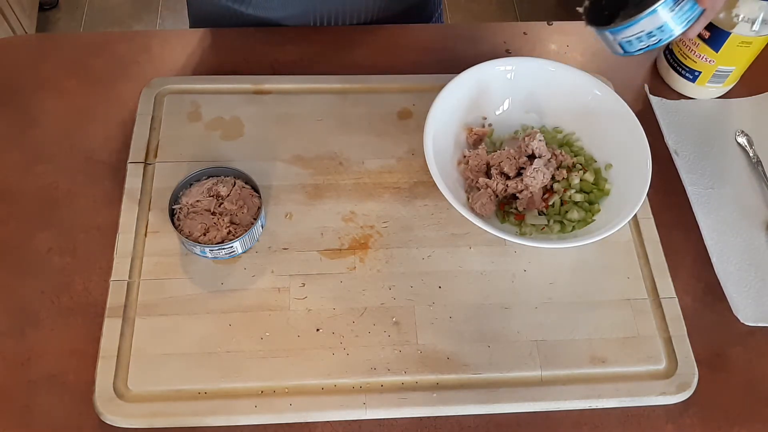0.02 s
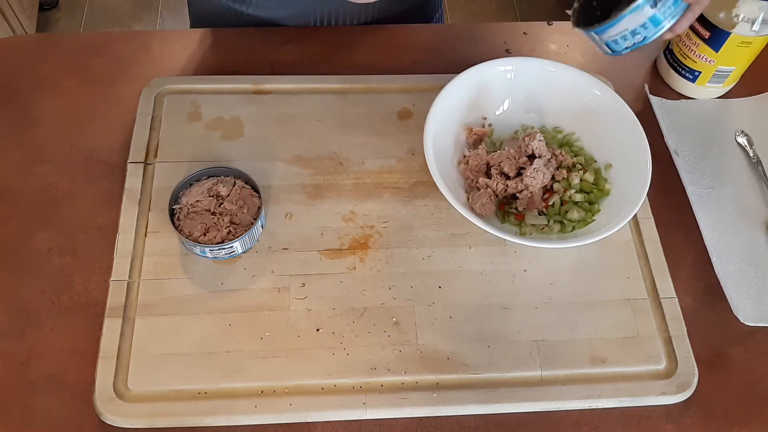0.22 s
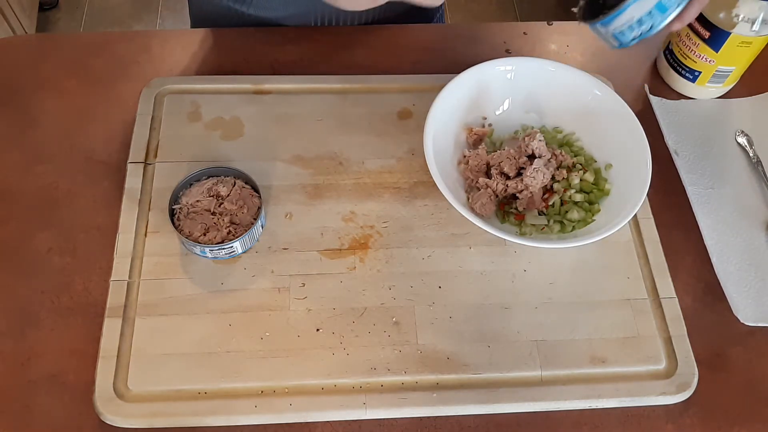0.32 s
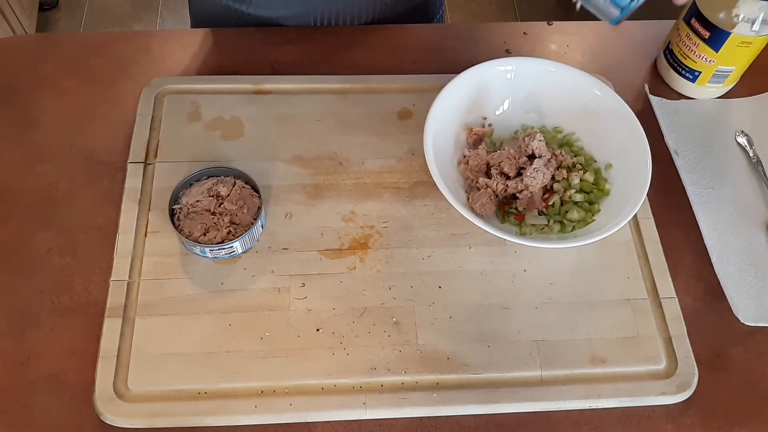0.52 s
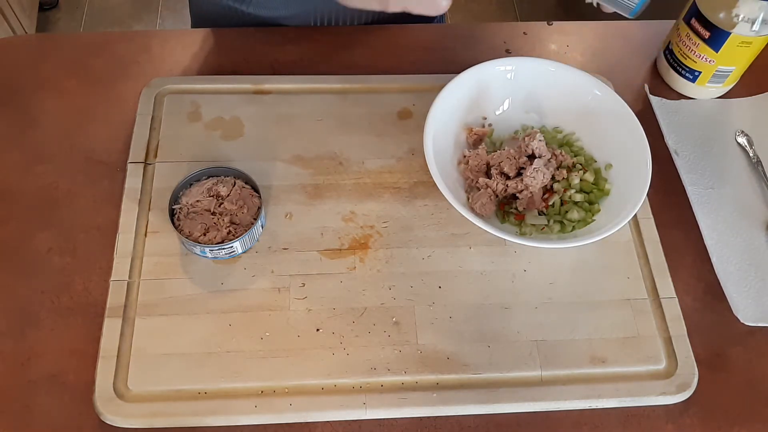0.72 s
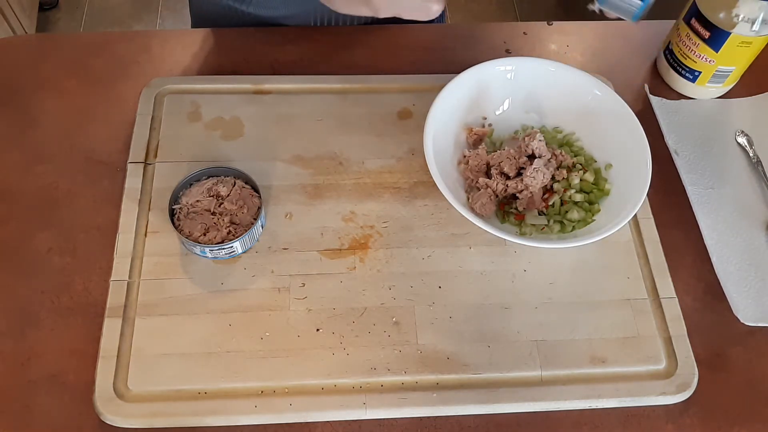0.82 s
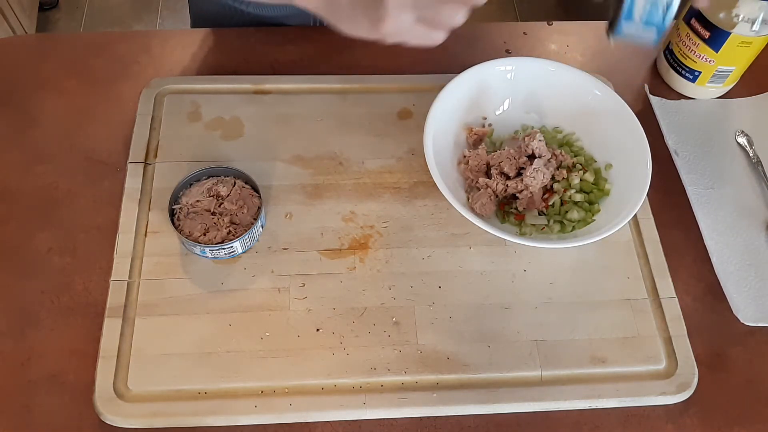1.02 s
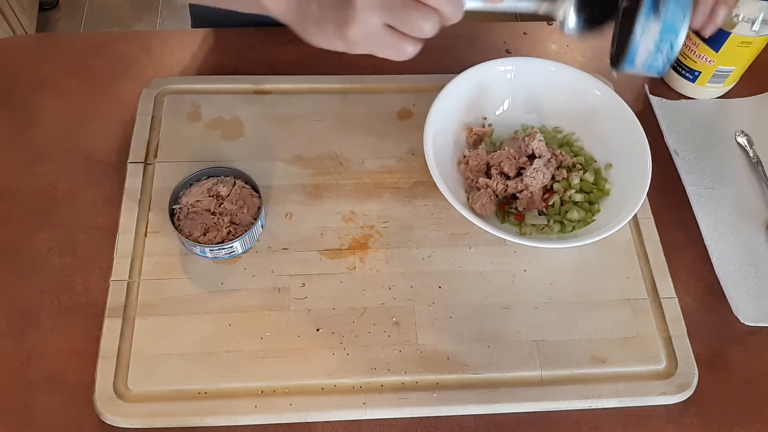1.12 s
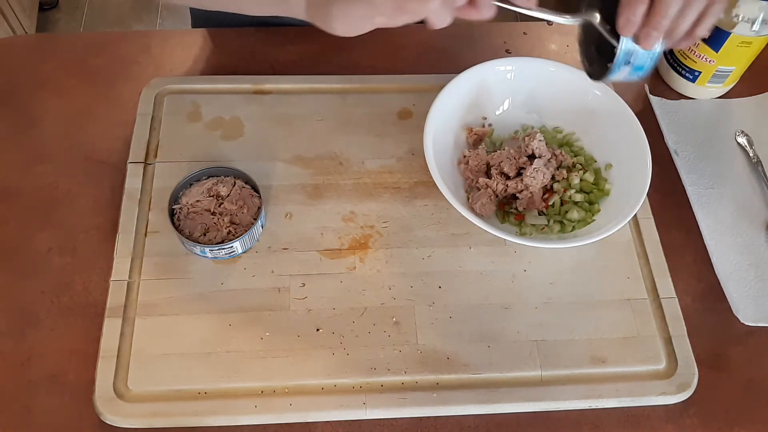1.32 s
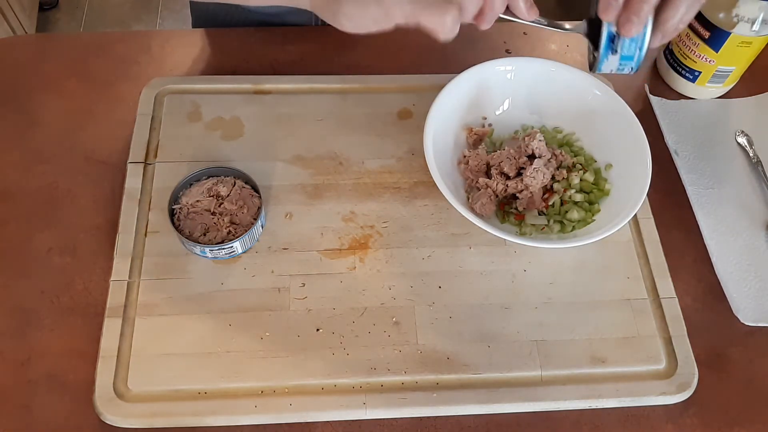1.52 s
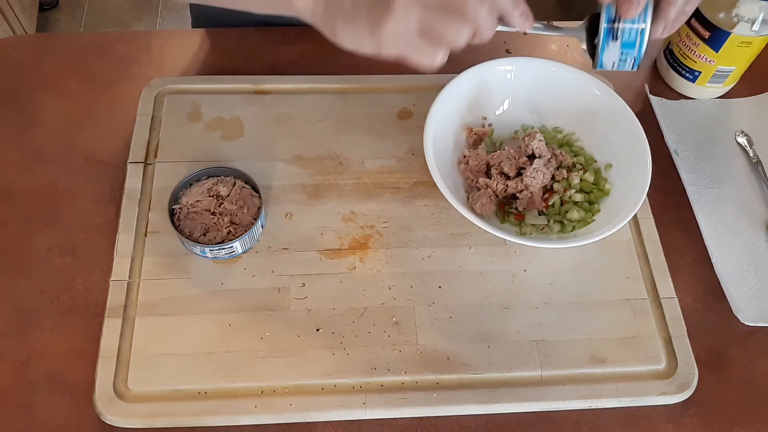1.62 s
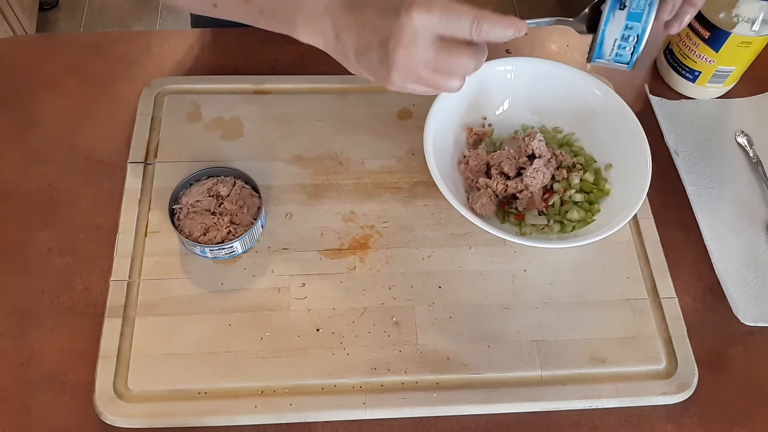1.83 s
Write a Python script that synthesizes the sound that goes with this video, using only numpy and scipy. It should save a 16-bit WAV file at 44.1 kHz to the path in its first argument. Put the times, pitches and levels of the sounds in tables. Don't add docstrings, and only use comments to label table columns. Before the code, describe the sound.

Sharp, short clinks and scrapes of a steel spoon against a hand-held tin can, faint fridge hum

```python
import sys
import numpy as np
from scipy import signal
from scipy.fft import rfft, irfft
from scipy.io import wavfile

SR = 44100
rng = np.random.default_rng(int(sys.argv[2]) if len(sys.argv) > 2 else 0)


def volts(x):
    e = np.asarray(x, float) / 20
    return 10 ** e


def master_out(mix):
    frames = np.transpose(np.atleast_2d(mix))
    ceiling = np.clip(frames, -1, 1)
    pcm = np.round(ceiling * 32767).astype(np.int16)
    wavfile.write(sys.argv[1], SR, pcm)


N = 83790
SECONDS = np.arange(N) / SR
TIP_FROM_S, LIP_FROM_S = 1.2, 1.6
RINGING_LOW_CUT_HZ, SMALL_LOW_CUT_HZ = 310, 630
THUD_S, THUD_LOW_HZ, THUD_HIGH_HZ = 0.01, 88.5, 450


def at_hz(points, hz):
    points_hz, values = np.transpose(points)
    return np.interp(np.log(np.maximum(hz, 1)), np.log(points_hz), values)


def rms_one(x):
    return x / np.sqrt(np.mean(x ** 2) + 1e-20)


def colour(x, points):
    return irfft(rfft(x) * volts(at_hz(points, np.fft.rfftfreq(N, 1 / SR))), N)


def above(x, hz):
    return signal.sosfilt(signal.butter(4, hz, "high", fs=SR, output="sos"), x)


def ring(clicks, hz, t60):
    radius, angle = volts(-60 / (t60 * SR)), 2 * np.pi * hz / SR
    feedback = [1, -2 * radius * np.cos(angle), radius * radius]
    return signal.lfilter([0, np.sin(angle)], feedback, clicks + 1e-18)


def grit(per_s=5100, spread_db=5.5):
    sizes = volts(spread_db * np.minimum(rng.exponential(1, N), 4)) * rng.choice([-1, 1], N)
    return rms_one(sizes * (rng.random(N) < per_s / SR))


def after_knocks(times, gains, decay_s):
    jumps = np.zeros(N)
    np.add.at(jumps, (times * SR).astype(int), gains)
    envelope = signal.lfilter([1], [1, -np.exp(-1 / (decay_s * SR))], jumps + 1e-18)
    return jumps, envelope


# start in seconds, length in seconds, then spoon, can and hiss levels in dB.
STROKES = [(-.03, 0.07, -45.5, -62, -44), (0.201, 0.029, -42, -54, -39), (0.324, 0.017, -79, -85, -58),
           (0.732, 0.08, -84.5, -88.5, -65.5), (1.02, 0.06, -63, -92.5, -57.5),
           (1.235, 0.019, -57, -67.5, -46.5), (1.258, 0.0129, -36, -61.5, -49),
           (1.27, 0.026, -40.5, -89, -41), (1.287, 0.019, -35, -64, -43), (1.337, 0.024, -42.5, -61, -38),
           (1.623, 0.04, -68.5, -70, -57.5), (1.635, .02, -56, -57.5, -69.5),
           (1.652, 0.021, -69, -61, -56.5), (1.69, 0.13, -78.5, -77, -62),
           (1.754, 0.049, -70.5, -67, -65.5), (1.83, 0.058, -94, -86, -66)]


def pressure(column):
    out = np.zeros(N)
    for row in STROKES:
        start, length = row[:2]
        shape = np.interp((SECONDS - start) / length, [0, 0.52, 1], [0, 1, 0])
        out += volts(row[column]) * np.sin(np.pi / 2 * shape)
    return out


# frequency in Hz, left minus right in dB.
BALANCE = [(60, -1.5), (110, -6.5), (200, 3.5), (380, 5.5), (700, -0.5), (1290, 1), (2380, 4.5), (4400, -6),
           (8120, -4.5), (15000, -15.5)]


def to_ports(x, hz, lag_s):
    n = np.arange(N)
    late = np.interp(n - lag_s * SR, n, x)
    half = at_hz(BALANCE, hz) / 2
    return np.array([late * volts(half), x * volts(-half)])


# frequency in Hz, delay in seconds.
LEFT_LAG = [(500, 0.00013), (1400, 0.00013), (2200, 0.000045), (3100, 0.00019), (4500, 0.00018),
            (6500, .00015), (10000, 0.00014)]


def body(modes, knocks, scrape=0):
    out, chatter = 0, grit(per_s=4000, spread_db=0.61)
    s, knock_db, bright_db = np.transpose(knocks)
    for hz, db, t60 in modes:
        octaves = np.log2(hz / 2000)
        uneven_db = 2 * rng.standard_normal(16)[:len(s)]
        gains = volts(knock_db + bright_db * octaves + uneven_db)
        jumps, tail = after_knocks(s, gains, decay_s=0.0034)
        rubbing = volts(2.5 * octaves) * scrape
        push = 0.64 * jumps + 0.038 * chatter * tail + 0.046 * rubbing
        split = 0.013 * rng.choice([-1, 1]) * rng.uniform(0.61, 1.11)
        twin = ring(push, hz * (1 + split), t60 * 0.95)
        pair = ring(push, hz, t60) + volts(-2.5) * twin
        lag = at_hz(LEFT_LAG, hz) + 0.00001 * rng.standard_normal()
        out = out + rng.choice([-1, 1]) * to_ports(volts(db) * pair, hz, lag)
    return out


# frequency in Hz, level in dB.
AIR = [(15, -49.5), (25, -17.5), (166, -6.5), (463, -13), (1400, -24), (1890, -20), (2220, -48),
       (3620, -24.5), (16000, -26.5)]
# frequency in Hz, likeness from 0 to 1.
AIR_ALIKE = [(30, .85), (200, 0.2), (1000, 0.9), (8000, .05)]
# frequency in Hz, level in dB, width in Hz.
HUM = [(61.4, -82, 3), (110.77, -71, 1.3), (164, -87.5, 8), (254, -73, 9.8), (447, -84, 19)]


def background():
    alike = at_hz(AIR_ALIKE, np.fft.rfftfreq(N, 1 / SR))
    mid, side = rfft(rng.standard_normal((2, N)))
    air = irfft(np.sqrt(1 + alike) * mid + np.sqrt(1 - alike) * side * [[1], [-1]], N)
    hum, steady = 0, 0.62
    for hz, db, width in HUM:
        waver = rms_one(ring(rng.standard_normal(N + SR), hz, 2.4 / width)[SR:])
        tone = np.sqrt(2 * steady) * np.sin(2 * np.pi * hz * SECONDS)
        hum = hum + volts(db) * (tone + np.sqrt(1 - steady) * waver)
    return volts(-69.5) * rms_one(colour(air, AIR)) + hum * volts([[2.5], [-2.5]])


# frequency in Hz, level in dB, t60 in seconds.
SPOON = [(681, -24, .06), (1147, -14.5, 0.084), (1845, -15, 0.1), (2867, -1, 0.03), (3800, -2.5, 0.036),
         (4150, -2, 0.01), (4330, 1.5, 0.009), (5670, -15, 0.0085), (7200, -4, 0.0055), (8240, -7.5, 0.044),
         (8450, -6.5, 0.035), (8860, -9, 0.034), (10800, -17, 0.027), (14000, -11.5, .03)]
# time in seconds, level in dB, brightness in dB per octave about 2 kHz.
SPOON_KNOCKS = [
    (.001, -43.5, -3.5),
    (0.015, -48, -7.5),
    (.194, -33.5, 0),
    (0.197, -37, 0.5),
    (0.217, -42, 4),
    (0.2272, -35.5, -4.5),
    (0.2315, -43, 4.5),
]


def spoon(rub):
    return body(SPOON, SPOON_KNOCKS, rub * pressure(column=2) * (SECONDS <= TIP_FROM_S))


# frequency in Hz, level in dB, t60 in seconds.
RIM = [(372, -19.5, 0.074), (606, -27.5, 0.05), (669.3, -11.5, 0.032), (719, -4, 0.13), (1095, -16, 0.058),
       (1345, -11, 0.11), (1700, -9.5, 0.052), (1869, -3, 0.05), (2610, -2.5, 0.021), (3240, -6, 0.043),
       (3950, -2.5, 0.023), (5050, -4.5, 0.024), (5860, -19.5, .04), (6910, -8, 0.02)]
# time in seconds, level in dB, brightness in dB per octave about 2 kHz.
RIM_KNOCKS = [
    (1.3194, -27, 4.5),
    (1.3215, -57, 14),
    (1.328, -35.5, 1.5),
    (1.337, -38, -5),
    (1.3625, -28.5, -2.5),
    (1.366, -29, 3),
]


def rim(rub):
    return body(RIM, RIM_KNOCKS, rub * pressure(column=3) * (SECONDS < LIP_FROM_S))


# frequency in Hz, level in dB, t60 in seconds.
WALL = [(377.3, -20.5, 0.15), (708.5, -8.5, 0.09), (1256, -15.5, 0.085), (1601, -16, 0.067),
        (1884, -6, 0.09), (2482, -4.5, 0.039), (3367, -8, .04), (3927, 2.5, 0.022), (4800, -3, 0.037),
        (5055, -12.5, 0.1), (5670, -8.5, 0.04), (6502, 0.5, 0.029), (8100, -15, 0.06),
        (11000, -18.5, 0.043)]
# time in seconds, level in dB, brightness in dB per octave about 2 kHz.
WALL_KNOCKS = [
    (.194, -50, 4),
    (.4775, -32.5, 1),
    (.4795, -28, 4),
    (.4815, -26, -3),
    (.5, -29, -2),
    (1.3194, -36.5, 4.5),
]


def wall(rub):
    return body(WALL, WALL_KNOCKS, 0.2 * rub * pressure(column=3))


# frequency in Hz, level in dB.
CRACK = [(300, -40), (900, -4.5), (2000, 3), (3100, 2.5), (5000, 4), (9000, 5), (13000, 2.5), (16000, -2)]
# frequency in Hz, level in dB.
HISS = [(500, -41), (1200, -7.5), (2500, -1), (4200, 10.5), (6000, 3.5), (9000, 4.5), (13000, -2),
        (16000, -2)]


def contact():
    knocks = [BASE_KNOCKS, WALL_KNOCKS, FAR_WALL_KNOCKS, RIM_KNOCKS, SPOON_KNOCKS, TIP_KNOCKS]
    s, db, bright_db = np.vstack(knocks).T
    pivot_db = -21
    strength = volts(pivot_db + 1.32 * (db - pivot_db - 6 + bright_db))
    envelope = after_knocks(s, strength, decay_s=0.0078)[1]
    shared = 0.26 * rng.standard_normal(N) + 0.5 * grit()
    noise = shared + 0.59 * rng.standard_normal((2, N))
    noise[0] = np.roll(noise[0], round(0.00013 * SR))
    balance = np.array(BALANCE)
    left = colour(noise[0], balance * [1, 0.5])
    right = colour(noise[1], balance * [1, -0.5])
    noise = np.array([left, right])
    return envelope * colour(noise, CRACK) + pressure(column=4) * colour(noise, HISS)


# frequency in Hz, t60 in seconds.
KITCHEN = [(200, 0.34), (700, 0.35), (2000, .36), (5000, 0.32), (10000, 0.34), (16000, 0.17)]


def kitchen():
    t = np.arange(SR // 2) / SR
    edges = 100 * 2 ** np.arange(0, 7.6, 0.5)
    white, echo = rng.standard_normal((2, 2, len(t))), 0
    for k, (low, high) in enumerate(zip(edges, edges[1:])):
        sos = signal.butter(2, [low, high], "band", fs=SR, output="sos")
        band = signal.sosfilt(sos, white[k % 2])
        tilt_db = -0.5 * k / 2
        echo = echo + band * volts(tilt_db - 60 * t / at_hz(KITCHEN, np.sqrt(low * high)))
    echo = echo * np.clip(t / 0.0012 - 1, 0, 1)
    return volts(-5.5) * echo / np.sqrt(np.sum(echo ** 2) / 2)


# frequency in Hz, level in dB, t60 in seconds.
BASE = [(388.3, -17, 0.078), (693, 9, 0.033), (1137, -10.5, 0.14), (1702, -6, 0.11), (1905, 5, 0.1),
        (2390, -5.5, 0.05), (2608, 0.5, 0.09), (2870, -5.5, .06), (3333, -5.5, .045), (4006, -3.5, .05),
        (4937, -4.5, 0.043), (6700, -14.5, 0.1), (723.2, 3.5, 0.18), (11650, -13.5, .05)]
# time in seconds, level in dB, brightness in dB per octave about 2 kHz.
BASE_KNOCKS = [
    (.2324, -22.5, 5),
    (.2338, -34, -4.5),
    (.2395, -31, 2.5),
    (.2438, -36, 7),
    (.2482, -33.5, 2),
    (.2565, -36.5, 4.5),
    (.2655, -52, 4.5),
    (.34, -45, 4.5),
]


def base():
    return body(BASE, BASE_KNOCKS)


# time in seconds, level in dB.
THUDS = [
    (0.232, -46),
    (0.249, -55),
    (0.489, -58),
    (0.499, -46.5),
    (0.931, -54),
    (.939, -53),
    (1.336, -57),
    (1.364, -52.5),
]


def thud():
    s, db = np.transpose(THUDS)
    envelope = after_knocks(s, volts(db), THUD_S)[1]
    band = signal.butter(2, [THUD_LOW_HZ, THUD_HIGH_HZ], "band", fs=SR, output="sos")
    noise = rng.standard_normal(N) + 0.3 * rng.standard_normal((2, N))
    return signal.sosfilt(band, envelope * noise) * np.sqrt(SR / 2 / THUD_HIGH_HZ)


# frequency in Hz, level in dB, t60 in seconds.
FAR_WALL = [(377, -20.5, 0.11), (711, -2.5, 0.064), (1109, -9, 0.059), (1479, -4.5, 0.017),
            (1883, -1.5, 0.024), (2018, -11.5, 0.062), (2503, -2.5, 0.022), (3268, -12, 0.12),
            (4000, 4.5, 0.016), (5020, -5, 0.027), (6437, -1.5, 0.017), (6650, -20.5, 0.067),
            (7820, -9, 0.073), (8500, -13, 0.12)]
# time in seconds, level in dB, brightness in dB per octave about 2 kHz.
FAR_WALL_KNOCKS = [
    (0.9023, -42, -0.5),
    (.9248, -26, 2.5),
    (0.926, -29, -4),
    (.938, -24, 1.5),
    (0.94, -30.5, 0),
    (1.065, -59, 5),
]


def far_wall():
    return body(FAR_WALL, FAR_WALL_KNOCKS)


# frequency in Hz, level in dB, t60 in seconds.
TIP = [(697, -16, 0.2), (1173, -12, 0.035), (1820, -11, 0.065), (2310, -21, 0.04), (3254, -3, 0.038),
       (4030, -6.5, .025), (4458, 3.5, 0.028), (4720, -21.5, 0.022), (6180, -7.5, 0.023),
       (7345, -14.5, 0.016), (8070, -4, 0.015), (8500, -3, 0.023), (8800, -4, 0.018), (11330, -37.5, 0.014)]
# time in seconds, level in dB, brightness in dB per octave about 2 kHz.
TIP_KNOCKS = [
    (1.2345, -29.5, 1.8),
    (1.2359, -35, 5.8),
    (1.245, -42, 0),
    (1.264, -39.5, -1.1),
    (1.2932, -39, 1.55),
    (1.304, -50, 0.66),
]


def spoon_tip(rub):
    scrape = rub * pressure(column=2) * (SECONDS > TIP_FROM_S)
    return above(body(TIP, TIP_KNOCKS, scrape), SMALL_LOW_CUT_HZ)


# frequency in Hz, level in dB, t60 in seconds.
LIP = [(1333, -12.5, 0.044), (1918, 3, 0.051), (2550, -2, 0.021), (3280, -2, 0.043), (4050, -0.5, 0.027),
       (5120, -6, 0.034), (6840, 2, .012), (8700, -6, 0.013)]
# time in seconds, level in dB, brightness in dB per octave about 2 kHz.
LIP_KNOCKS = [
    (1.644, -63.5, 0.91),
    (1.659, -53, -1),
    (1.778, -65, 2),
]


def lip():
    scrape = grit() * pressure(column=3) * (SECONDS > LIP_FROM_S)
    return above(body(LIP, LIP_KNOCKS, scrape), SMALL_LOW_CUT_HZ)


def scene():
    rub = grit()
    ringing = base() + wall(rub) + far_wall() + rim(rub) + spoon(rub) + spoon_tip(rub)
    metal = above(ringing, RINGING_LOW_CUT_HZ) + above(contact(), SMALL_LOW_CUT_HZ) + thud()
    room, air = kitchen(), background()
    metal = metal + lip()
    return metal + signal.fftconvolve(metal, room, axes=1)[:, :N] + air


def top_cut(x):
    return signal.sosfilt(signal.butter(12, 16800, fs=SR, output="sos"), x)


def record(dry):
    low_pass = signal.cheby2(12, 60, 16520, fs=SR, output="sos")
    mix = signal.sosfilt(low_pass, dry)
    return top_cut(mix)


dry = scene()
out = record(dry)
master_out(out)
```